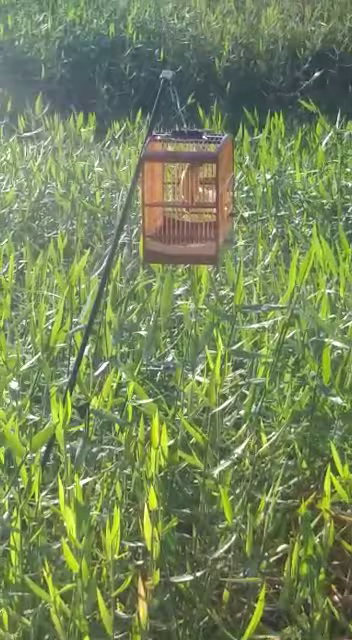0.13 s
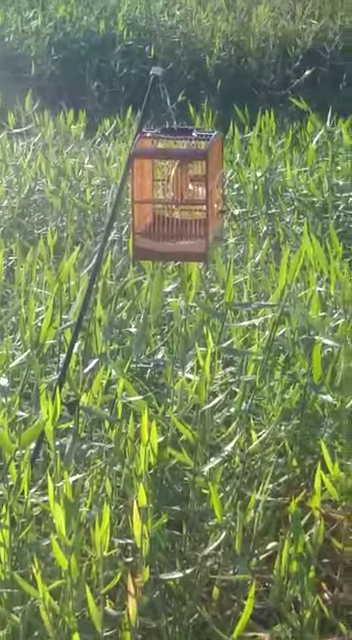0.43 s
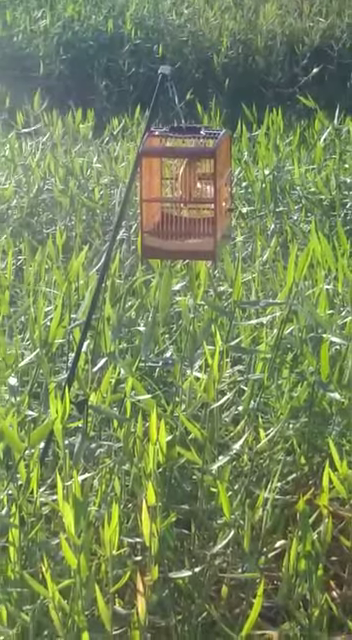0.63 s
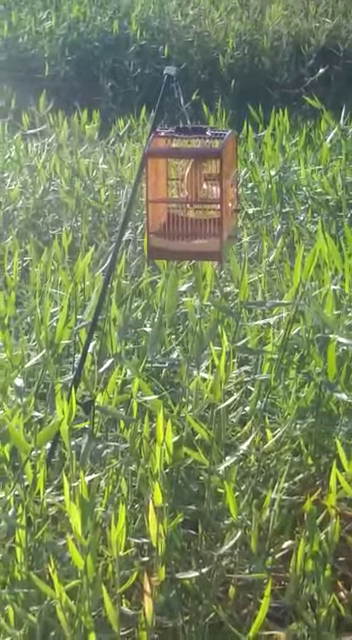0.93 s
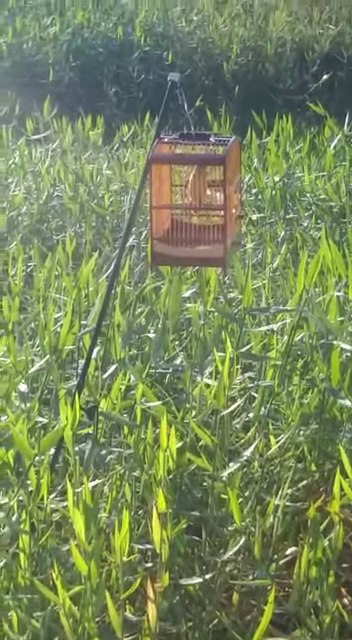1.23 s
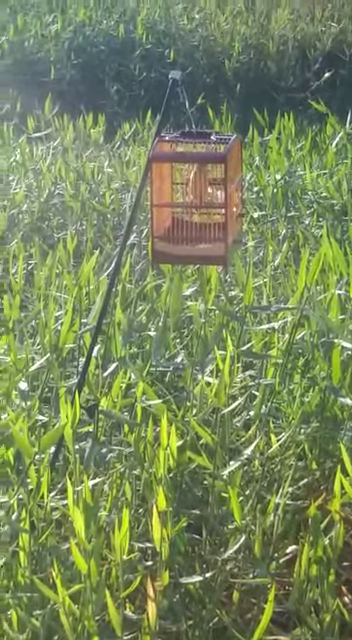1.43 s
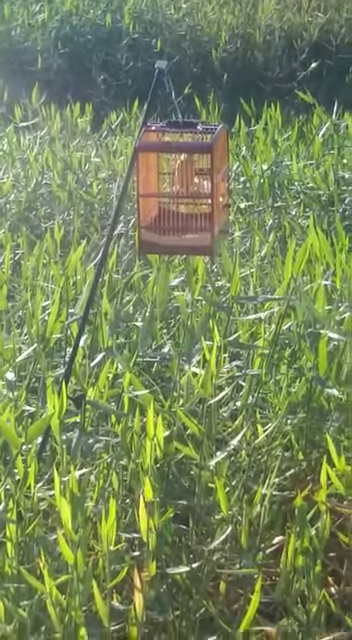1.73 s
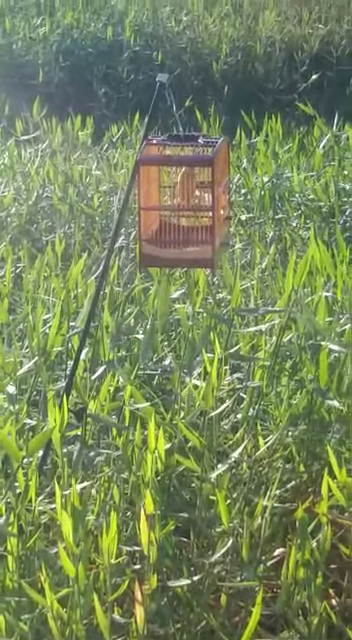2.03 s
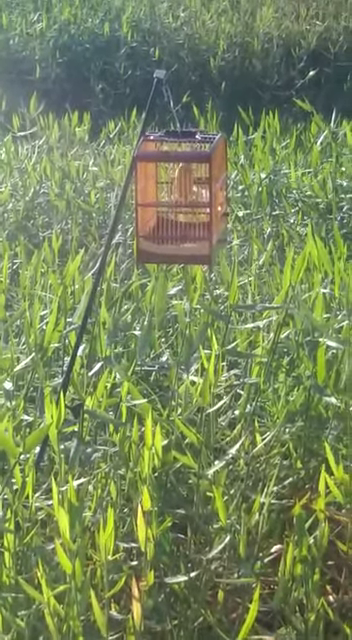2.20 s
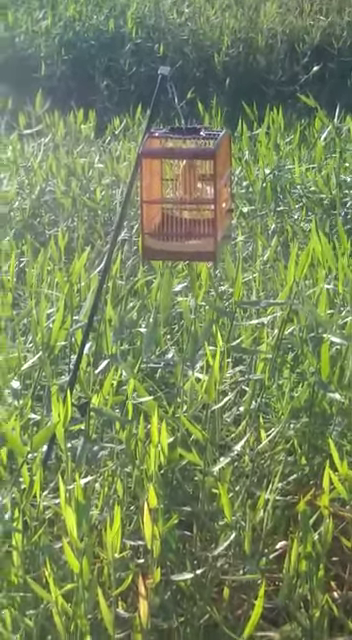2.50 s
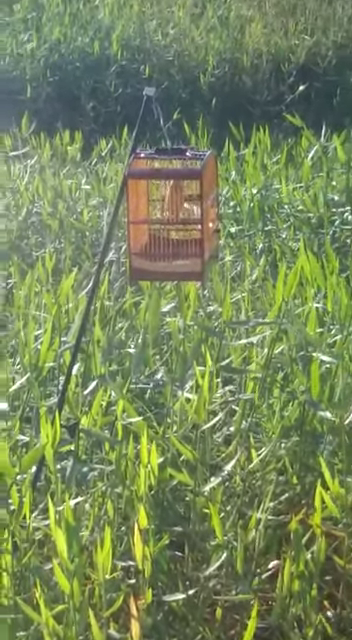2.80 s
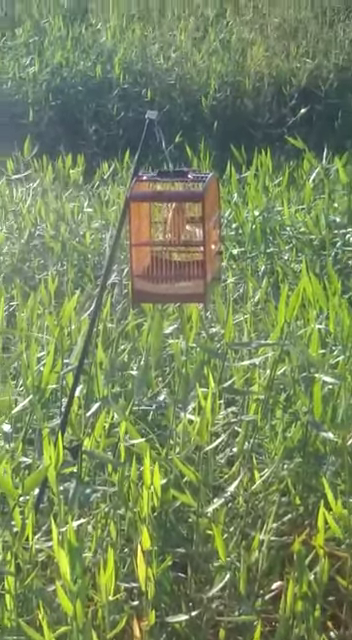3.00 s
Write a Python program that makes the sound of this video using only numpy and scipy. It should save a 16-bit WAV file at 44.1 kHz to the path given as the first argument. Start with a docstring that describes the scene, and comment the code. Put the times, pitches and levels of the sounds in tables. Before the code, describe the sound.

A small caged bird sings quick falling whistles and a buzzy slide over trilling crickets

```python
"""Caged seedeater singing in tall grass

A soft lead-in, four falling whistles, a buzzy downward slide and the start of another whistle, cut off by
the end, are near-pure tones with weak overtones. Crickets chirp as runs of wing-stroke pulses over a throbbing
noise band, the far chorus. Other birds call faintly as arched tones. Decaying noise echoes from cage and grass
scatter the sounds, and shaped noise makes the ticks in the cage, the rustles, the low rumble and the hiss.
"""
import sys
import numpy as np
from scipy import signal
from scipy.fft import rfft, irfft, next_fast_len
from scipy.io import wavfile

SR = 44100
rng = np.random.default_rng(int(sys.argv[2]) if len(sys.argv) > 2 else 0)


def generate_wav(sig):
    """Save sig (samples, or channels by samples) to the path in sys.argv[1] as 16-bit PCM at SR."""
    pcm = np.round(np.clip(np.atleast_2d(sig).T, -1, 1) * 32767).astype(np.int16)
    wavfile.write(sys.argv[1], SR, pcm)


N = 138915
T = np.arange(N) / SR   # s

# Spectrum of the open field's air noise: f/Hz, relative level/dB
AIR_SPECTRUM = [(15, -55.5), (25, -25), (66, 4), (92, 2.5), (142, 1.5), (220, -10), (298, -2), (378, -9.5),
                (440, -5), (501, -8.5), (610, -9), (710, -14), (1200, -5), (1730, -16), (2100, -17.5),
                (2340, -17), (4500, -22), (5850, -67.5), (9900, -120)]
AIR_DB = -69.5
EDGE_S, RELEASE_S = 0.0012, 0.0064   # onset and end of the bird's notes
CAGE_T60_S, GRASS_T60_S = 0.06, 0.26   # times for the scatter to decay by 60 dB


def from_db(db):
    """Level to amplitude: 20 dB is a factor of ten."""
    return 10 ** (np.asarray(db) / 20)


def rms_one(x):
    """Normalisation to unit mean power."""
    return x / np.sqrt(np.mean(x ** 2) + 1e-20)


def in_time(rows):
    """Piecewise-linear envelopes: each column after the first is interpolated over time."""
    s, *columns = np.transpose(rows)
    return [np.interp(T, s, column) for column in columns]


def at_hz(points, hz):
    """Spectral envelope in dB, interpolated on a logarithmic frequency axis."""
    f, db = np.transpose(points)
    return np.interp(np.log(np.maximum(hz, 1)), np.log(f), db)


def noise(spectrum):
    """Filtered white noise of unit power, falling away beyond the ends of its spectrum."""
    hz = np.arange(N // 2 + 1) * SR / N + 0.0008   # the offset avoids division by zero
    lowest_hz, highest_hz = spectrum[0][0], spectrum[-1][0]
    upper_skirt = 1 / (1 + (hz / highest_hz / 1.1) ** 16)
    lower_skirt = 1 / (1 + (lowest_hz / hz / 1.1) ** 4)
    white = rfft(rng.standard_normal(N))
    return rms_one(irfft(white * from_db(at_hz(spectrum, hz)) * upper_skirt * lower_skirt, N))


def drift(rate_hz):
    """Low-passed random fluctuation of unit spread, at half amplitude at the given rate."""
    hz = np.arange(N // 2 + 1) * SR / N
    return rms_one(irfft(rfft(rng.standard_normal(N)) / (1 + (hz / rate_hz) ** 2), N))


def gate(start, end, attack, release):
    """Amplitude envelope with sine-squared attack and release."""
    ramp = np.clip(np.minimum((T - start) / attack, (end - T) / release), 0, 1)
    return np.sin(np.pi / 2 * ramp) ** 2


def turn(hz):
    """Phase in radians as the running integral of frequency."""
    return 2 * np.pi * np.cumsum(hz) / SR


def syrinx(hz, overtones, throat):
    """Source and filter: a near-pure tone with weak harmonics coloured by the throat."""
    phase = turn(hz)
    upper = np.zeros(N)
    for multiple, db in overtones:
        partial_hz = multiple * hz
        gain = from_db(db + at_hz(throat, partial_hz)) * (partial_hz < SR / 2)
        upper += gain * np.sin(multiple * phase)
    return np.sqrt(2) * (np.sin(phase) + upper)   # unit-power fundamental


def whistles():
    """Frequency glide: each note scoops up, falls sigmoidally towards rest, with a downward flick at its end."""
    # Whistles: start t/s, end t/s, top f/Hz, resting f/Hz, time of the fall t/s, steepness of the fall
    notes = [(1.65, 1.832, 2996, 2863, 0.082, 7.1), (1.907, 1.995, 5130, 4376, 0.034, 3.2),
             (2.055, 2.214, 3943, 3321, 0.028, 2.6), (2.282, 2.445, 5044, 4293, .039, 3.13),
             (2.495, 2.608, 3920, 3378, 0.026, 3.24), (3.128, 3.2, 4010, 3460, 0.057, 7)]
    # Level of each whistle but the one begun at the end, one list a note: t/s, level/dB
    efforts = [
        [(1.65, -77.5), (1.694, -50), (1.77, -38.5), (1.812, -38), (1.824, -44), (1.832, -65)],
        [(1.904, -48.5), (1.912, -29.5), (1.922, -24), (1.934, -33), (1.942, -21.5), (1.962, -24),
         (1.986, -34.5), (1.996, -30.5)],
        [(2.055, -57), (2.061, -33.5), (2.067, -24), (2.079, -36), (2.091, -25), (2.105, -23.5), (2.171, -38),
         (2.199, -32), (2.212, -51.5)],
        [(2.281, -41), (2.293, -25), (2.305, -33.5), (2.317, -18.5), (2.333, -21.5), (2.361, -34.5),
         (2.421, -25.5), (2.437, -29.5), (2.446, -36.5)],
        [(2.494, -53.5), (2.5, -29.5), (2.508, -22), (2.516, -32), (2.542, -24), (2.6, -35), (2.608, -46.5)],
    ]
    # Level of the whistle that is just beginning at the end: t/s, level/dB
    beginning_effort = [(3.137, -64.5), (3.15, -33)]
    # Harmonics: multiple, level/dB before the throat
    overtones = [(2, -25), (3, -39), (4, -53)]
    # Throat response to the harmonics: f/Hz, gain/dB
    throat = [(5500, -12), (7000, -11.5), (8700, -8), (10000, -12), (12000, -3.5), (13500, 9), (15500, 5.5)]
    scoop_hz, scoop_s = 444, 0.0026
    flick_hz, flick_s = 450, 0.0032
    waver = 20.4 * drift(180)   # Hz
    out = np.zeros(N)
    for note, effort in zip(notes, list(efforts) + [beginning_effort]):
        start, end, top_hz, rest_hz, fall_s, steepness = note
        age = np.maximum(T - start, 0)
        fall = (top_hz - rest_hz) / (1 + (age / fall_s) ** steepness)
        scoop = scoop_hz * np.exp(-age / scoop_s)
        flick = flick_hz * np.exp(np.minimum(T - end, 0) / flick_s)
        tone = syrinx(rest_hz + fall - scoop + waver - flick, overtones, throat)
        out += tone * from_db(in_time(effort)[0]) * gate(start, end, EDGE_S, RELEASE_S)
    return out


def slide():
    """Frequency modulation: a fast, slightly uneven warble makes a long falling tone buzzy."""
    # Slide: t/s, f/Hz, level/dB, warble depth/Hz
    path = [(2.758, 8700, -64, 102.8), (2.773, 7770, -39.5, 197), (2.785, 6865, -24, 490),
            (2.81, 6370, -22.5, 600), (2.849, 5530, -21, 574), (2.891, 4750, -21, 365),
            (2.913, 4554, -22, 99), (2.923, 4370, -41, 60)]
    # Harmonics: multiple, level/dB before the throat
    overtones = [(2, -24.5), (3, -24.5)]
    # Throat response to the slide's harmonics: f/Hz, gain/dB
    throat = [(8800, -16), (10000, -12), (11200, 2.5), (12600, 1.5), (13800, -5), (15500, 0.5)]
    warble_hz, warble_jitter, rough_hz = 158, 0.06, 96   # jitter is a fraction of the rate
    hz, db, depth = in_time(path)
    warble = np.sin(turn(warble_hz * (1 + warble_jitter * drift(65.2))))
    hz = hz + depth * warble + rough_hz * drift(188)
    return syrinx(hz, overtones, throat) * from_db(db) * gate(path[0][0], path[-1][0], EDGE_S, RELEASE_S)


def reflections(x):
    """Early reflections: the direct sound plus delayed, weaker copies."""
    # Bounces from cage and ground: delay t/s, level/dB
    bounces = [(.0015, -5), (.0039, -6.5), (.008, -17)]
    return x + sum(from_db(db) * np.interp(T - delay, T, x, left=0) for delay, db in bounces)


def cage_ticks():
    """Impact decay: the bird shifts, and each knock on perch or bars is noise dying exponentially."""
    # Knocks: t/s, level/dB
    ticks = [(2.465, -57), (2.526, -51), (2.596, -53)]
    # Spectrum of the knocks: f/Hz, relative level/dB
    colour = [(300, -19), (1200, -4.5), (2500, -12.5), (6000, -7.5), (15000, -20.5)]
    t60_s = 0.036
    envelope = np.zeros(N)
    for s, db in ticks:
        envelope += from_db(db - 60 * np.maximum(T - s, 0) / t60_s) * (T >= s)
    return noise(colour) * envelope


def wing_strokes(start, rate, hz, sag_hz, share):
    """Stridulation: a short tone for each wing stroke sags in pitch; share is its part of the period."""
    stroke = np.clip((T - start) * rate % 1 / share, 0, 1)
    return np.sin(np.pi * stroke) * np.sin(turn(hz + sag_hz * (.5 - stroke)))


def low_crickets():
    """Stridulation pulses, nearly clean: each chirp swells while it rises to its pitch."""
    # Chirps of a near cricket, then of one further off: start t/s, end t/s, peak level/dB
    chirps = [(0.467, 0.75, -48), (1.166, 1.445, -48), (1.857, 2.10, -47.5), (2.526, 2.816, -48.5),
              (-.1, .15, -59.5), (0.656, 0.926, -61), (1.39, 1.667, -62), (2.027, 2.285, -59.5)]
    pitch_hz, rise_hz, sag_hz = 5577, 178, 40
    strokes_per_s, swell_s = 58, 0.1
    rasp = 35.2 * drift(230)   # Hz
    out = np.zeros(N)
    for start, end, db in chirps:
        hz = pitch_hz + rasp - rise_hz * np.clip(1 - (T - start) / swell_s, 0, 1)
        envelope = from_db(db) * gate(start, end, swell_s, 0.011)
        out += envelope * wing_strokes(start, strokes_per_s, hz, sag_hz, share=0.82)
    return out


def high_crickets():
    """Stridulation pulses, raspier from random pitch modulation: chirps with an abrupt onset."""
    # Chirps of two crickets answering each other: start t/s, end t/s, mean f/Hz, peak level/dB
    chirps = [(.163, 0.446, 7050, -48.5), (0.697, 0.955, 7070, -47.5), (1.229, 1.483, 7044, -47),
              (1.736, 1.995, 7025, -47.5), (2.288, 2.536, 7065, -47.5), (2.792, 3.075, 7040, -51.5),
              (-.1, 0.142, 6630, -49.5), (0.455, 0.686, 6625, -53.5), (0.976, 1.244, 6720, -54),
              (1.564, 1.8, 6670, -54.5), (2.158, 2.396, 6670, -53), (2.701, 2.945, 6690, -52)]
    strokes_per_s, swell_s, sag_hz = 47, 0.0046, 119.9
    rasp = 66 * drift(250)   # Hz
    out = np.zeros(N)
    for start, end, hz, db in chirps:
        envelope = from_db(db) * gate(start, end, swell_s, 0.008)
        out += envelope * wing_strokes(start, strokes_per_s, hz + rasp, sag_hz, share=0.74)
    return out


def far_birds():
    """Frequency glide: faint pure tones follow a parabola in pitch under a half-sine swell."""
    # Calls: start t/s, length t/s, first f/Hz, middle f/Hz, last f/Hz, peak level/dB
    calls = [(.222, 0.12, 1900, 2190, 1700, -53.5), (-.04, 0.078, 2100, 1950, 1850, -65.5),
             (1.03, 0.032, 9100, 7800, 10600, -64.5), (1.108, .03, 7100, 7500, 4700, -73)]
    out = np.zeros(N)
    for start, length, first_hz, middle_hz, last_hz, db in calls:
        progress = np.clip((T - start) / length, 0, 1)
        parabola = np.polyfit([0, .5, 1], [first_hz, middle_hz, last_hz], 2)
        hz = np.polyval(parabola, progress)
        out += from_db(db) * np.sin(np.pi * progress) * np.sin(turn(hz))
    return out


def chorus():
    """Incoherent sum: many far crickets merge into a noise band that throbs at their stroke rate."""
    # Spectrum of the far crickets: f/Hz, relative level/dB
    spectrum = [(5000, -45), (5900, -25.5), (6250, -14.5), (6450, -14), (6600, 1.5), (6800, -6),
                (6980, -3.5), (7150, -4.5), (7300, -27.5), (7800, -26.5), (8500, -49)]
    # Their loudness before the throb: t/s, level/dB
    level = [(0, -55), (.3, -56.5), (1.4, -55.5), (1.55, -58.5), (1.85, -53.5), (2.1, -60.5), (2.35, -53),
             (2.52, -55), (2.62, -64), (2.95, -51.5), (3.15, -58)]
    throb_hz, throb_db = 45.6, 2
    throb = np.sin(turn(throb_hz * (1 + 0.038 * drift(4))))
    return noise(spectrum) * from_db(in_time(level)[0] + throb_db * throb)


def scatter(x, t60):
    """Diffuse reverberation: convolution with decaying noise, countless small echoes from bars or stalks."""
    # Thin stalks scatter the treble most: f/Hz, gain/dB
    scatter_gain = [(2000, -6.5), (3200, -1), (4500, 0), (6500, 0.5), (10000, 5.5), (14000, 4)]
    t = T[:SR // 2]
    echoes = rng.standard_normal(len(t)) * from_db(-60 * t / t60)
    echoes /= np.linalg.norm(echoes)
    size = next_fast_len(N + SR)
    colour = from_db(at_hz(scatter_gain, np.arange(size // 2 + 1) * SR / size))
    return irfft(rfft(x, size) * rfft(echoes, size) * colour, size)[:N]


def field():
    """Broadband ambience: shaped noise gives a low rumble, faint rustles and a thin hiss."""
    # Faint stirs: centre t/s, half length t/s (to 1/e), level/dB
    rustles = [(0.342, .025, -67), (.87, .07, -72), (1.761, .05, -71), (2.545, .06, -72)]
    # Spectrum of the stirs: f/Hz, relative level/dB
    rustle_colour = [(250, -4.5), (340, 4), (700, -3.5), (1250, 1.5), (1700, -13.5)]
    # Spectrum of the hiss: f/Hz, relative level/dB
    hiss_spectrum = [(3000, -33), (4800, -1.5), (8000, -3.5), (11000, -5.5), (15500, -0.5)]
    sway_db, hiss_db = 0.2, -77.5
    stirs = sum(from_db(db) * np.exp(-((T - s) / half) ** 2) for s, half, db in rustles)
    rumble = from_db(AIR_DB + sway_db * drift(6)) * noise(AIR_SPECTRUM)
    return rumble + stirs * noise(rustle_colour) + from_db(hiss_db) * noise(hiss_spectrum)


def scene():
    """Mid-side superposition: sources lie straight ahead; scattered sound and air give a little width."""
    bird = whistles() + reflections(slide()) + cage_ticks()
    low = low_crickets()
    far = high_crickets() + far_birds()
    into_grass = from_db(-18) * bird + from_db(-22) * low + from_db(-6) * far
    cage_echoes = from_db(-15) * scatter(bird + low, CAGE_T60_S)   # quick, from bars and nearby leaves
    grass_echoes = scatter(into_grass, GRASS_T60_S)
    mid = bird + low + far + cage_echoes + grass_echoes + chorus() + field()
    side_air = from_db(AIR_DB + 4) * noise(AIR_SPECTRUM)
    side = from_db(-26.5) * (scatter(bird + far, CAGE_T60_S) + side_air)
    return np.array([mid + side, mid - side])


def record(dry):
    """Low-pass filtering: a steep elliptic filter removes the top above 15850 Hz."""
    ripple_db, stop_db = 0.1, 80
    return signal.sosfilt(signal.ellip(12, ripple_db, stop_db, 15850, fs=SR, output="sos"), dry)


dry = scene()
out = record(dry)
generate_wav(out)
```